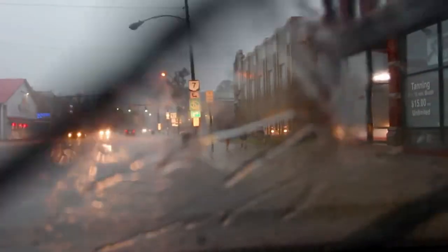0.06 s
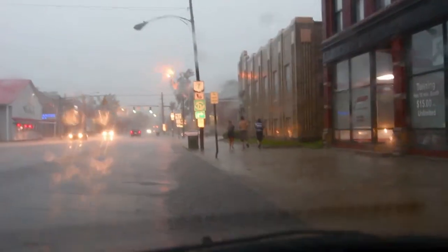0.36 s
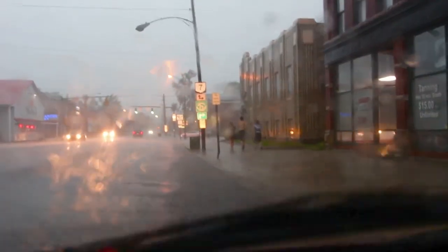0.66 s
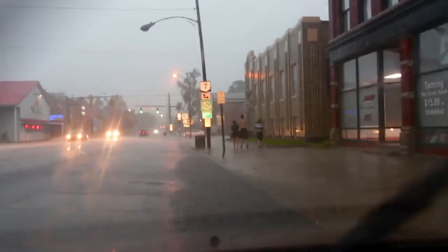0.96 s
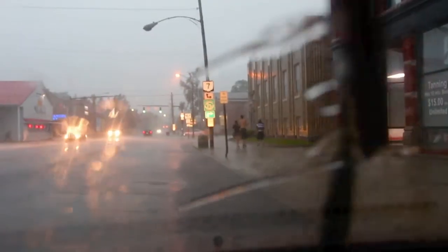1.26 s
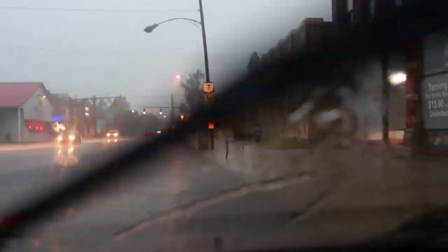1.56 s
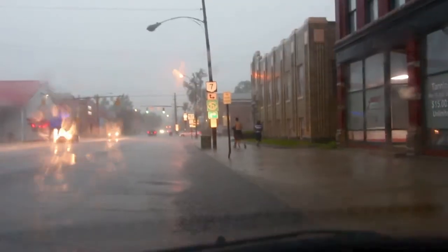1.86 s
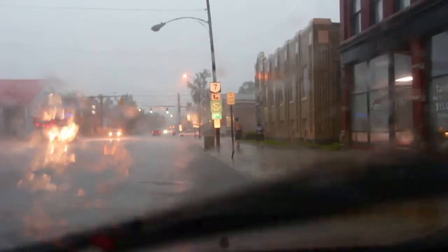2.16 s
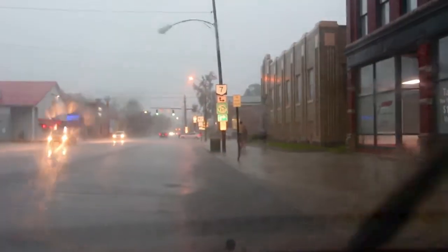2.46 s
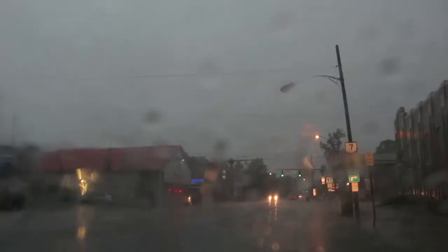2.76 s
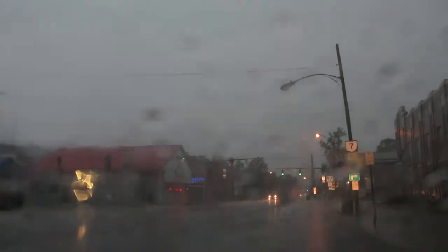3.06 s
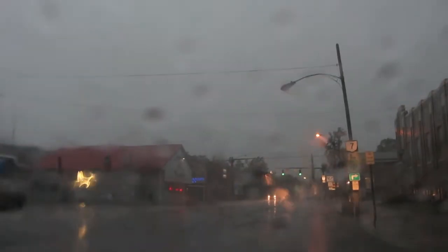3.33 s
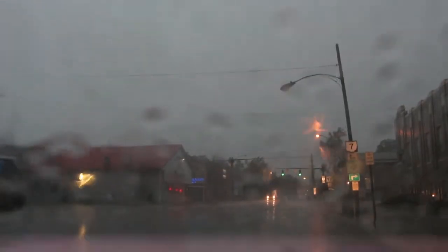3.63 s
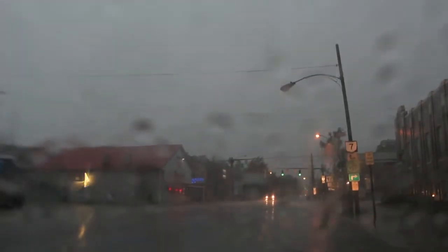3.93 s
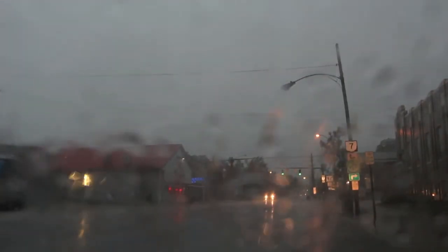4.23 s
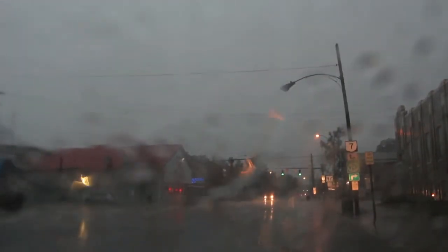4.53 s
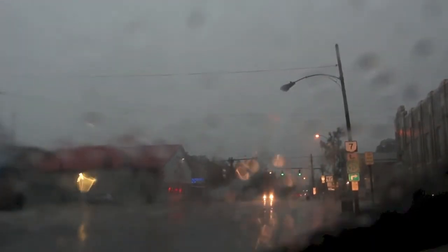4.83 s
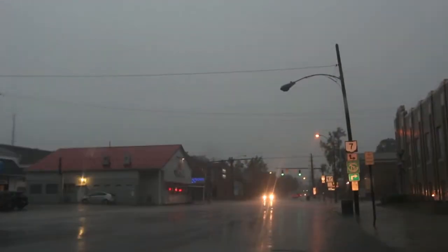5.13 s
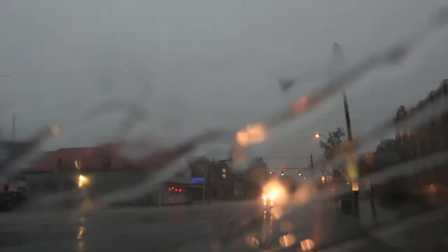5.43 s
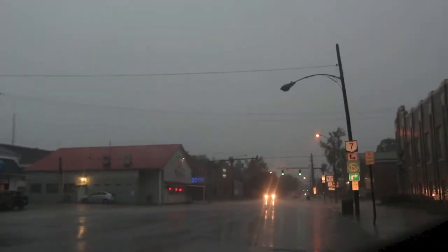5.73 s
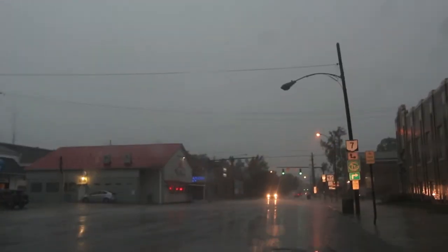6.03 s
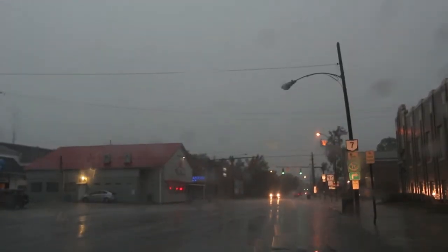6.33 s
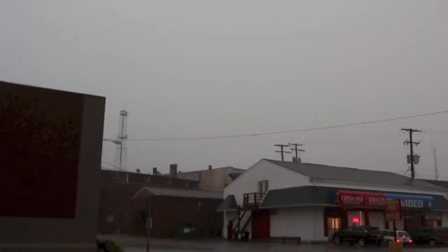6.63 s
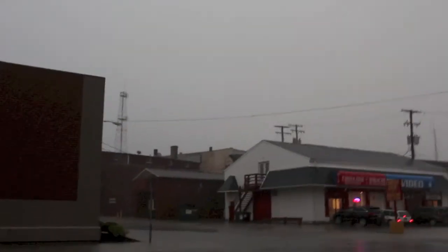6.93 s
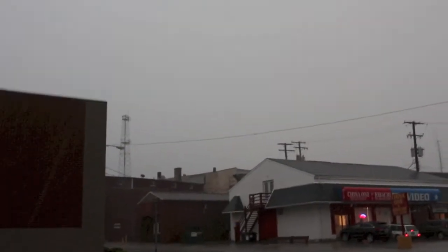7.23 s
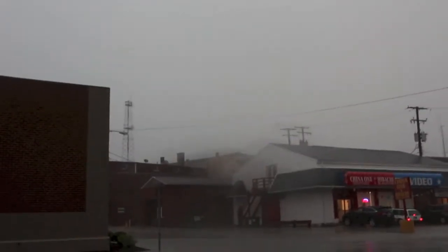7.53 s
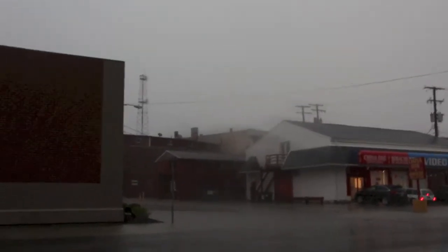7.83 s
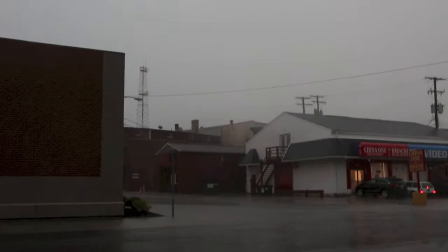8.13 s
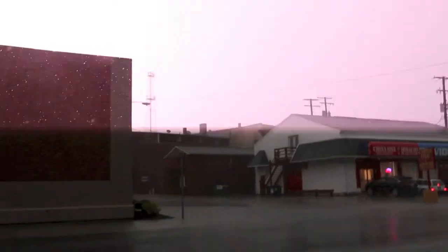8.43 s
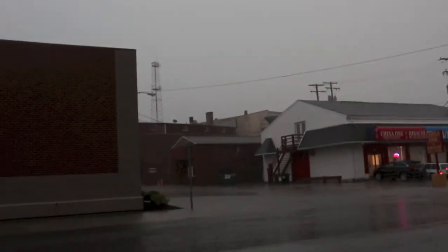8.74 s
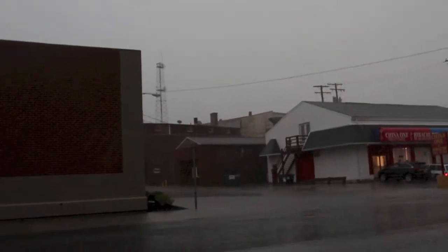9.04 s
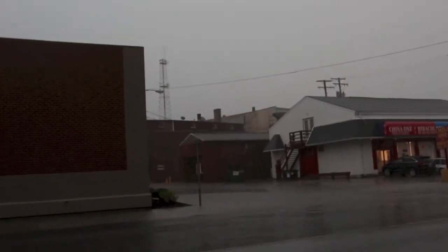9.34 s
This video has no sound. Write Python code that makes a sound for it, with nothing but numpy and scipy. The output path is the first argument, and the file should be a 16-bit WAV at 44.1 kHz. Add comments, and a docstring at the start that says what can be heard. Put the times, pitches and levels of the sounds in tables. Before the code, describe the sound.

From inside a parked car, heavy rain drums on the body and hisses on the street while low thunder rolls and booms, making the cabin drone. A wiper knocks early on and fat drops slap the roof. After a brief dropout, water gushes over the glass and the thunder peaks. Following a second dropout, hard thumps ring a panel, gusts buffet the car and wind whistles through a gap near the end.

```python
"""Thunderstorm from a parked car

Thunder sets the cabin droning, gusts buffet the car and hard thumps ring a panel.
Rain drums on the body and hisses on the street, while single drops slap, tick and splash nearby.
A wiper knocks and squeaks, water gushes over the glass, and late on a gust whistles in a gap.
The recorder's gain ducks the rain sound after loud booms and thuds.
Two quick fades split the storm into three stretches, each with its own tone."""
import sys
import numpy as np
from scipy import signal
from scipy.fft import rfft, irfft, next_fast_len
from scipy.io import wavfile
from scipy.ndimage import uniform_filter1d, minimum_filter1d

SR = 44100
rng = np.random.default_rng(int(sys.argv[2]) if len(sys.argv) > 2 else 0)


def persist_wave(psi):
    """Save psi, clipped to +-1, as 16-bit WAV."""
    counts = np.round(np.clip(psi, -1, 1) * 32767).astype(np.int16)
    wavfile.write(sys.argv[1], SR, np.atleast_2d(counts).T)


N = 418509
TIME = np.arange(N) / SR
SIZE = next_fast_len(N + SR // 4)
FREQS = np.maximum(np.arange(SIZE // 2 + 1) * SR / SIZE, 1)

# The roll of thunder. Each row: time in seconds, deep swell in dB, upper cabin drone in dB.
THUNDER_ROLL = [(0, -38.5, -35.5), (1.3, -31.5, -24.5), (2.1, -30.5, -21.5), (2.25, -39, -27.5),
                (2.4, -32.5, -31.5), (2.55, -39, -33), (2.85, -33, -27), (3.5, -30.5, -20),
                (4.05, -31.5, -26), (4.3, -36.5, -18.5), (4.62, -29, -18), (5.3, -36, -19.5),
                (5.9, -35, -24), (6.1, -33, -20.5), (6.55, -39, -26), (7.25, -38, -27.5),
                (7.65, -40.5, -28.5), (8.0, -38, -23), (8.8, -35.5, -26), (9.49, -39.5, -29.5)]
# Booms within the roll. Each row: start and length in seconds, lower and upper drone in dB.
THUNDER_BOOMS = [(0.057, 0.035, -33.5, -18), (0.13, 0.13, -24, -21.5), (0.352, 0.032, -16.5, -34),
                 (0.426, 0.038, -21, -26), (0.57, 0.02, -17, -30), (0.637, 0.15, -28.5, -21.5),
                 (0.814, 0.067, -14.5, -36.5), (1.003, 0.068, -18.5, -19.5), (1.132, 0.065, -18, -20.5),
                 (1.267, 0.029, -21, -16), (1.405, 0.094, -31.5, -17), (1.586, 0.068, -14, -20.5),
                 (1.817, 0.036, -30, -16.5), (1.982, 0.067, -21.5, -15), (2.18, 0.037, -22.5, -16),
                 (2.373, 0.03, -17.5, -16), (2.442, 0.059, -22, -16.5), (2.543, 0.049, -22, -15),
                 (3.045, 0.022, -9, -27), (3.091, 0.022, -24.5, -14), (3.137, 0.012, -9, -9.5),
                 (3.254, 0.024, -14, -29.5), (3.328, 0.027, -9.5, -21), (3.395, 0.053, -17, -22.5),
                 (3.506, 0.12, -23, -19), (3.993, 0.054, -11.5, -17), (4.504, 0.016, -29.5, -12.5),
                 (4.547, 0.04, -14, -23.5), (4.74, 0.053, -21, -15), (4.912, 0.082, -11.5, -24),
                 (5.135, 0.073, -14, -17.5), (5.234, 0.0074, -21.5, -11.5), (5.323, 0.053, -37, -15),
                 (5.582, 0.077, -21.5, -14), (5.711, 0.11, -33.5, -14), (6.067, 0.057, -19, -13.5),
                 (6.233, 0.017, -26.5, -10), (6.293, 0.023, -21.5, -14.5), (6.432, .035, -16, -24),
                 (6.908, 0.04, -25.5, -27.5), (8.026, 0.022, -20, -18.5), (8.523, 0.031, -35.5, -15.5),
                 (8.827, 0.016, -27, -15.5), (9.092, 0.0092, -29, -15.5), (9.202, 0.018, -14.5, -26.5)]
# The upper drone wavers. Each row: time in seconds, pitch in Hz (only its swing is used).
DRONE_WAVER = [(.5, 183.2), (2.9, 188.2), (3.6, 175.9), (4.8, 195), (5.5, 194.9), (6.0, 179.5),
               (6.45, 193.2), (7.5, 171.5), (8.9, 188.7)]
# Rain drumming on the car. Each row: time in seconds, level in dB.
RAIN_DRUMMING = [(0, -25), (.35, -25), (.9, -28), (2.05, -22), (2.58, -28.5), (2.75, -25.5), (3.1, -24),
                 (3.45, -25), (3.75, -27.5), (4.2, -25), (5.05, -30), (5.65, -29.5), (5.85, -31),
                 (6.55, -32), (6.65, -25.5), (7.25, -24), (7.65, -29), (8.03, -23), (8.15, -25.5),
                 (8.4, -22.5), (8.65, -25), (8.85, -21.5), (9.05, -20.5), (9.49, -28)]
# Rain on street and glass. Each row: time in seconds, hiss in dB, fine spray in dB.
RAIN_HISS = [(0, -47.5, -59), (.9, -53, -77.5), (1.2, -47.5, -66.5), (1.8, -53.5, -72.5),
             (2.58, -53, -77.5), (2.66, -58, -61.5), (3.3, -55.5, -67), (3.47, -59, -74), (3.55, -56, -62),
             (3.85, -55, -61.5), (4.35, -54, -66.5), (5.05, -57, -78.5), (5.25, -54.5, -72.5),
             (5.65, -52, -65.5), (5.85, -54.5, -78), (6.05, -52.5, -66.5), (6.55, -54, -73),
             (6.64, -62.5, -104), (7.15, -57.5, -77), (7.42, -59, -83), (7.6, -54.5, -64.5),
             (8.0, -50.5, -63.5), (8.55, -51.5, -59.5), (8.85, -48.5, -61), (9.25, -55.5, -68.5),
             (9.49, -51, -60)]
# The recorder's gain briefly ducks the rain sound after loud booms and thuds, most in the treble.
# Each row: start and length in seconds, depth for the hiss in dB.
GAIN_DUCKS = [(0.183, 0.016, 8), (1.441, 0.015, 7), (1.625, 0.046, 5.5), (3.133, 0.049, 8),
              (3.355, 0.029, 7.5), (4.027, 0.017, 6), (4.792, 0.027, 4), (4.978, 0.054, 4),
              (5.782, 0.023, 6.5), (7.318, 0.033, 10), (8.681, 0.042, 6.5), (8.883, 0.025, 11.5),
              (9.1, 0.1, 7.5)]
# What that depth is multiplied by for the drumming, the splashing and the spray.
GAIN_DUCK_SHARES = (0.55, 0.85, 1.15)
# Splashing in each stretch, in dB against the average of drumming and hiss.
SPLASH_OFFSETS = (-1, -0.5, 0)
# Gusts, then knocks of the wiper arm. Each row: start in seconds, peak in dB, length in seconds,
# brightness in dB, opening crack in dB.
GUST_THUDS = [(.645, -13.5, 0.02, 8.5, -26), (2.0, -15, 0.0049, 7, -22), (3.136, -12.5, 0.0022, 1, -39),
              (3.258, -17, 0.013, 4.5, -32), (4.008, -13.5, 0.006, -3, -30.5),
              (4.197, -10.5, 0.016, -3, -21), (6.665, -12, 0.014, 1, -31.5),
              (6.802, -12, 0.004, 5.5, -30.5), (6.944, -15, 0.0065, -10.5, -40),
              (7.255, -13, 0.003, -4, -34.5), (8.456, -15, 0.0049, 6, -23),
              (8.645, -11, 0.0029, -15, -27.5), (8.68, -7.5, 0.019, -8.5, -34.5),
              (8.838, -9.5, 0.02, 1, -25), (8.878, -10.5, 0.026, 3.5, -30), (9.04, -10, 0.047, -0.5, -27),
              (9.147, -8.5, 0.018, 2.5, -22.5)]
WIPER_KNOCKS = [(.168, -7.5, 0.019, 14.5, -19), (.305, -13, 0.029, 13.5, -21),
                (1.397, -12, 0.045, 15.5, -23.5), (4.561, -8, 0.012, 18, -15)]
# Rubber catching on glass. Each row: start in seconds, peak in dB, length in seconds, brightness in dB.
WIPER_SQUEAKS = [(1.234, -25.5, .007, -4)]
# Thumps on a panel. Each row: start in seconds, peak in dB, ring time in seconds,
# brightness in dB per octave, opening crack in dB.
PANEL_THUMPS = [(6.646, -13, 0.01, -4, -20.5), (6.738, -9.5, .013, -4, -22), (7.211, -6.5, 0.015, 1, -15.5),
                (7.266, -7.5, .01, 0.5, -22.5), (7.291, -7.5, 0.009, -5, -26.5),
                (7.314, -7.5, 0.0071, -7.5, -26.5), (9.092, -10, 0.0089, -3.5, -19.5)]
# The notes that panel rings at. Each row: pitch in Hz, level in dB.
PANEL_MODES = [(272, 0.5), (365, -5.5), (535, -6.5), (775, -12), (1287, -27)]
# Fat drops on the roof. Each row: start in seconds, peak in dB.
ROOF_SLAPS = [(.624, -25), (.675, -13), (.913, -16), (1.736, -23.5), (1.948, -17), (2.357, -18),
              (2.466, -16), (3.093, -15), (3.365, -17.5), (3.411, -17), (3.883, -17.5), (4.411, -21),
              (4.477, -19.5), (4.752, -13.5), (5.655, -18.5), (7.95, -17)]
# Close drops. Each row: start in seconds, peak in dB, left over right in dB, brightness in dB.
CLOSE_DROPS = [(1.061, -42.5, -17, -6), (1.2945, -40, -13, -14), (2.089, -48, -9, -10),
               (2.706, -32, -12, -11), (2.815, -29, -20, -11), (6.098, -39, -19, -27),
               (6.919, -37.5, -7, -27), (7.4736, -22, -11, 15), (7.993, -32.5, 3, -15)]
# Bursting drops. Each row: start in seconds, peak in dB, left over right in dB, pitch in Hz.
CLOSE_SPLASHES = [(7.924, -49, -15, 4900), (7.967, -48.5, -8, 4840), (8.44, -42, 8, 3260),
                  (8.561, -56, -15, 11800), (8.61, -61, -11.5, 8750), (9.147, -57, -15, 4700),
                  (8.338, -66, -14, 9450)]
# Water running over the glass. Each row: time in seconds, level in dB.
GUSH_LEVELS = [(2.61, -71), (2.645, -31), (2.76, -33), (2.99, -35), (3.1, -42.5), (3.2, -68), (3.4, -88)]
# Wind in a gap. Each row: time in seconds, pitch in Hz, level in dB.
GAP_WHISTLE = [(8.68, 900, -63), (8.83, 927, -28.5), (8.92, 920, -42.5), (9.05, 975, -39), (9.17, 915, -46),
               (9.3, 943, -45), (9.49, 957, -57)]
# The tone of each small source. Each row: frequency in Hz, gain in dB.
GUST_TONE = [(60, -41.5), (170, -0.5), (270, 4.5), (450, -1.5), (750, -14.5), (1400, -28.5), (3000, -59),
             (12000, -125)]
KNOCK_TONE = [(60, -25.5), (150, 1.5), (400, 12.5), (600, 4), (900, -3), (1300, -23.5), (2000, -30),
              (3200, -50.5), (10000, -115)]
SQUEAK_TONE = [(500, -32.5), (1100, -9), (1320, 16.5), (1550, -23.5), (3000, -66)]
CRACK_TONE = [(300, -4.5), (700, 8.5), (1400, -5.5), (2100, -14.5), (3000, -29.5), (6000, -66.5),
              (13000, -100)]
SLAP_TONE = [(200, -5), (570, 6.5), (850, -7), (1400, -19), (3000, -38), (13000, -105)]
DROP_TONE = [(600, -37), (1400, -17.5), (1900, 14.5), (2700, 7), (3600, 0), (5000, -9.5), (7000, -13.5),
             (9000, -37.5), (13000, -64.5)]
GUSH_TONE = [(300, -17), (700, 4.5), (1200, -2.5), (2200, -11.5), (3400, -15.5), (5000, -25), (6500, -37),
             (9000, -49.5), (13000, -69)]
# The tone of the storm in each stretch. Each row: frequency in Hz, gain in dB.
FIRST_TONE = [(25, -16), (55, -9), (95, -13.5), (135, 7.5), (200, -3), (240, -12.5), (320, -10), (560, -18),
              (800, -24.5), (1300, -38), (2200, -42.5), (3400, -48.5), (4400, -62), (5500, -73.5),
              (8000, -88.5), (12000, -102)]
SECOND_TONE = [(25, -26), (60, -20), (95, -21.5), (130, -3), (200, -2), (260, -16.5), (340, -16),
               (540, -20.5), (800, -26.5), (1300, -37.5), (1750, -39), (2400, -40), (3400, -44.5),
               (4400, -59), (5500, -68), (8000, -90.5), (12000, -102)]
THIRD_TONE = [(25, -18.5), (55, -21.5), (100, -14), (175, 4), (215, 2), (260, 1.5), (480, -14.5),
              (700, -13), (1000, -19), (2100, -34.5), (3400, -44), (4400, -61.5), (5500, -73), (7000, -83),
              (9000, -89), (12000, -91.5)]
# Pitches the cabin boosts. Each row: centre in Hz, width in Hz, boost in dB.
CABIN_RESONANCES = [(68, 53, 6), (124, 2.3, 8), (184.6, 12, 8.5), (515, 190, 5.5)]
# Near-silent moments between stretches. Each row: time, fade-out and fade-in, all in seconds.
FADES = [(2.629, 0.089, 0.095), (6.598, 0.084, 0.054)]
# The left side against the right. Each row: frequency in Hz, level in dB, phase lead in radians,
# likeness from 0 to 1.
STEREO_IMAGE = [(25, 0, -.2, .98), (60, -.2, -.42, .99), (150, -1.5, -.72, .995), (250, -3.2, -1, .985),
                (400, -7.2, -1.35, .97), (620, -11, -1.6, .93), (1000, -16.3, -2.3, .67),
                (1500, -20, -3.5, .68), (3000, -22.5, -4.3, .76), (4500, -20, -4.6, .76),
                (9000, -10, -4.6, .3)]


def thunder():
    """Rolling pressure pulses set two cabin resonances droning over a deep swell; booms drive them."""
    swell_db, drone_db = in_time(THUNDER_ROLL)
    lower_power = from_db(-26.5 + 0.52 * (swell_db - swell_db.mean())) ** 2   # partly follows the swell
    upper_power = from_db(drone_db - 2.5) ** 2
    for s, length_s, lower_db, upper_db in THUNDER_BOOMS:
        power = swell_and_fade(s, length_s, attack_s=0.0051, release_s=0.02) ** 2
        lower_power += power * from_db(lower_db - 3) ** 2
        upper_power += power * from_db(upper_db - 1) ** 2
    pulses = impacts(per_s=250, spread_db=0.5, wash_db=-4.5)
    lower = np.sqrt(lower_power) * through_car(pulses, 78, 160.8, span_s=0.045)
    drone_hz, = in_time(DRONE_WAVER)
    drone = through_car(pulses, 177.4, 256.6, span_s=0.056)
    upper = np.sqrt(upper_power) * shifted(drone, drone_hz - drone_hz.mean())
    swell = from_db(swell_db - 0.5) * through_car(pulses, 24, 97, span_s=0.26)
    return lower + upper + swell


def rain():
    """Heavy drops drum on the panels; countless small ones splash and hiss on glass and street."""
    drumming_db, = in_time(RAIN_DRUMMING)
    hiss_db, spray_db = in_time(RAIN_HISS)
    stretch = np.searchsorted([s for s, _, _ in FADES], TIME)
    splash_db = (drumming_db + hiss_db) / 2 + np.take(SPLASH_OFFSETS, stretch)
    duck_db = sum(depth * swell_and_fade(s, length_s, attack_s=0.0098, release_s=0.04)
                  for s, length_s, depth in GAIN_DUCKS)
    drumming_duck, splash_duck, spray_duck = [share * duck_db for share in GAIN_DUCK_SHARES]
    heavy = impacts(per_s=600, spread_db=0.5, wash_db=2)
    # small drops arrive in clumps
    clumps = from_db(0.45 * wander(rate_hz=51)) * (1 + 0.44 * flurries(per_s=19, decay_s=0.018))
    fine = impacts(per_s=900, spread_db=0.5, wash_db=2) * clumps
    patter = fine * np.sqrt(clumps)
    ticks = impacts(per_s=26, spread_db=1.5, wash_db=-39.5)   # the nearest drops stand out
    drumming = from_db(drumming_db - drumming_duck - 1.04) * through_car(heavy, 250.5, 727, span_s=0.64)
    splash = from_db(splash_db - splash_duck) * through_car(heavy + fine, 866, 1770, span_s=0.76)
    hiss = from_db(hiss_db - duck_db) * through_car(patter + 0.28 * ticks, 2000, 4300, span_s=0.21)
    spray = from_db(spray_db - spray_duck) * through_car(patter + 0.35 * ticks, 4300, 13000, span_s=1)
    return drumming + splash + hiss + spray


def gusts():
    """Gusts buffet the car with short, dull thuds."""
    return blows(GUST_THUDS, GUST_TONE, corner_hz=437)


def panel_thumps(attack_s=0.0014, crack_s=0.0043):
    """A hard blow opens with a crack and rings the panel, whose higher notes die sooner."""
    hz, mode_db = np.transpose(PANEL_MODES)[..., None]
    age, ratio = TIME[:SR // 4], hz / hz[0]
    click, out = response(CRACK_TONE), 0
    for s, db, ring_s, tilt_db, crack_db in PANEL_THUMPS:
        turns = hz * (1 + 0.048 * rng.standard_normal(hz.shape)) * age   # each thump is a bit off pitch
        decay = np.exp(-age * np.sqrt(ratio) / ring_s)
        modes = from_db(mode_db + tilt_db * np.log2(ratio)) * np.sin(2 * np.pi * turns) * decay
        ring = at_peak(modes.sum(axis=0) * (1 - np.exp(-age / attack_s)), db)
        crack = at_peak(signal.fftconvolve(burst(crack_s), click), crack_db)
        out = out + placed(ring, s) + placed(crack, s)
    return out


def wiper():
    """The wiper arm knocks, and its rubber catches on the glass with a squeak."""
    knocks = blows(WIPER_KNOCKS, KNOCK_TONE, corner_hz=2300)
    squeak = blow(response(SQUEAK_TONE), *WIPER_SQUEAKS[0], corner_hz=1300)
    return knocks + squeak


def roof_slaps():
    """Fat drops each give the roof one short blow."""
    roof = response(SLAP_TONE)
    return sum(placed(at_peak(roof, db), s) for s, db in ROOF_SLAPS)


def close_drops(length_s=0.0019):
    """Single drops tick on the frame right by the listener."""
    tick = response(DROP_TONE)
    return sum(panned(blow(tick, s, db, length_s, bright_db, corner_hz=2800), pan_db)
               for s, db, pan_db, bright_db in CLOSE_DROPS)


def close_splashes(tick_s=0.0013, spray_db=-21.5, spray_s=0.05, band_ratio=1.13):
    """A drop bursts with a bright tick, and its droplets trail off as a fine spray."""
    age, out = TIME[:SR // 3], 0
    envelope = np.exp(-age / tick_s) + from_db(spray_db) * np.exp(-age / spray_s)
    for s, db, pan_db, hz in CLOSE_SPLASHES:
        around_pitch = signal.butter(2, [hz / band_ratio, hz * band_ratio], "band", fs=SR, output="sos")
        splash = signal.sosfilt(around_pitch, envelope * rng.standard_normal(len(age)))
        out = out + panned(placed(at_peak(splash, db), s), pan_db)
    return out


def gush():
    """A sheet of water on the glass breaks into splattering clumps of drops."""
    level_db, = in_time(GUSH_LEVELS)
    water = shaped(impacts(per_s=490, spread_db=0, wash_db=1), tone_filter(GUSH_TONE))
    level = from_db(level_db + 0.52 * wander(rate_hz=46))
    return panned(steady(water, span_s=0.042) * level, pan_db=-14.5)


def whistle(width_hz=17):
    """Wind rushes through a gap: a narrow band of noise that rises with the gust."""
    hz, level_db = in_time(GAP_WHISTLE)
    phase = 2 * np.pi * np.cumsum(hz) / SR
    rush = wander(width_hz) * np.sin(phase) + wander(width_hz) * np.cos(phase)
    return rush * from_db(level_db) * (TIME > GAP_WHISTLE[0][0]) * from_db([[-3], [-1]])


def through_car(x, low_hz, high_hz, span_s):
    """One band of the storm, given the car's tone in each stretch and evened out to level 1."""
    cabin_db = sum(boost * resonance(hz, width) for hz, width, boost in CABIN_RESONANCES)
    spectrum = rfft(x, SIZE) * band(low_hz, high_hz)
    out = np.zeros((2, N))
    for s, tone in zip([0, FADES[0][0], FADES[1][0]], [FIRST_TONE, SECOND_TONE, THIRD_TONE]):
        start = int(s * SR)
        heard = irfft(spectrum * from_db(in_frequency(tone)[0] + cabin_db), SIZE)[:, :N]
        out[:, start:] = steady(heard, span_s)[:, start:]
    return out


def stereo(direct, diffuse):
    """The left side hears the storm later and duller, and less like the right in the treble."""
    balance_db, phase, alike = in_frequency(STEREO_IMAGE)
    balance = from_db(balance_db)
    centre = np.sqrt(1 + balance ** 2 + 2 * balance * alike * np.cos(phase)) / 2
    to_left = balance * np.exp(1j * phase) / centre
    left = shaped(direct, to_left * alike) + shaped(diffuse, to_left * np.sqrt(1 - alike ** 2))
    return np.array([left, shaped(direct, 1 / centre)])


def impacts(per_s, spread_db, wash_db):
    """Two unrelated showers of uneven impacts over the smooth wash of far ones."""
    sizes = from_db(spread_db * np.minimum(rng.exponential(1, (2, N)), 4))
    hits = sizes * rng.choice([-1, 1], (2, N)) * (rng.random((2, N)) < per_s / SR)
    return hits / hits.std() + from_db(wash_db) * rng.standard_normal((2, N))


def flurries(per_s, decay_s):
    """A level that jumps and falls back each time a fat drop shatters into droplets."""
    sizes = np.minimum(rng.exponential(1, N), 2.5) * (rng.random(N) < per_s / SR)
    return signal.lfilter([1], [1, -np.exp(-1 / (decay_s * SR))], sizes + 1e-18)


def blows(table, tone, corner_hz):
    """Short rushes of pressure, dulled by the body they strike; each opens with a crack."""
    body, crack = response(tone), response(CRACK_TONE)
    return sum(blow(body, s, db, length_s, bright_db, corner_hz) + placed(at_peak(crack, crack_db), s)
               for s, db, length_s, bright_db, crack_db in table)


def blow(body, s, peak_db, length_s, bright_db, corner_hz):
    """One rush of pressure through a body; a harder contact lifts the range above the corner."""
    rush = signal.fftconvolve(burst(length_s), body)
    filters = [signal.butter(1, corner_hz, kind, fs=SR, output="sos") for kind in ("low", "high")]
    low, high = [signal.sosfilt(np.vstack([sos, sos]), rush) for sos in filters]
    return placed(at_peak(low - from_db(bright_db) * high, peak_db), s)


def burst(length_s):
    """A short rush of noise that rises fast and dies away."""
    age = TIME[:SR // 4] / length_s
    return rng.standard_normal(len(age)) * np.sqrt(age) * np.exp(-np.minimum(age, 10) ** 2)


def swell_and_fade(s, length_s, attack_s, release_s):
    """A level that rises to 1, holds until its length is up, then dies away."""
    live = slice(int(s * SR), int((s + length_s + 10 * release_s) * SR))
    age, out = TIME[live] - s, np.zeros(N)
    out[live] = np.clip(age / attack_s, 0, 1) * np.exp(-np.maximum(age - length_s, 0) / release_s)
    return out


def wander(rate_hz):
    """A slow random wobble with a typical size of 1."""
    slow = shaped(rng.standard_normal(N), band(1, rate_hz))
    return slow / slow.std()


def response(tone):
    """How a body with this tone answers a single click."""
    return irfft(tone_filter(tone), SIZE)[:SR // 8]


def tone_filter(tone):
    """A filter with this tone that makes no sound before the blow (minimum phase)."""
    cepstrum = irfft(np.log(from_db(in_frequency(tone)[0])), SIZE)
    cepstrum[1:SIZE // 2] *= 2
    cepstrum[SIZE // 2 + 1:] = 0
    return np.exp(rfft(cepstrum))


def band(low_hz, high_hz):
    """Gains that keep only what lies between two frequencies."""
    return ((1 + (low_hz / FREQS) ** 16) * (1 + (FREQS / high_hz) ** 16)) ** -.5


def resonance(hz, width_hz):
    """A hump of height 1 around one frequency."""
    return 1 / (1 + ((FREQS ** 2 - hz ** 2) / (FREQS * width_hz)) ** 2)


def shaped(x, gain):
    """Filter with a gain for each frequency."""
    return irfft(rfft(x, SIZE) * gain, SIZE)[..., :N]


def shifted(x, hz):
    """Move every frequency by so many Hz."""
    return np.real(signal.hilbert(x, SIZE)[..., :N] * np.exp(2j * np.pi * np.cumsum(hz) / SR))


def steady(x, span_s):
    """Even out the level to 1 over each span, keeping the quicker grain."""
    power = uniform_filter1d(x ** 2, int(span_s * SR), axis=-1)
    return x / np.sqrt(np.abs(power) + 1e-20)


def limiter(x, ceiling, size):
    """Turn the level down smoothly around any peak above the ceiling."""
    allowed = ceiling / np.maximum(np.abs(x).max(axis=0), ceiling)
    held = minimum_filter1d(allowed, 2 * size)
    return x * uniform_filter1d(uniform_filter1d(held, size), size)


def in_time(rows):
    """Turn each column into a curve over time."""
    s, *columns = np.transpose(rows)
    return [np.interp(TIME, s, c) for c in columns]


def in_frequency(rows):
    """Turn each column into a curve over frequency."""
    hz, *columns = np.transpose(rows)
    return [np.interp(np.log(FREQS), np.log(hz), c) for c in columns]


def at_peak(x, peak_db):
    """Scale a sound to its peak level."""
    return x * from_db(peak_db) / (np.abs(x).max() + 1e-20)


def placed(x, s):
    """Start a short sound at second s."""
    return np.pad(x, (int(s * SR), N))[:N]


def panned(x, pan_db):
    """Make two channels, with the left pan_db above the right."""
    return x * from_db([[pan_db / 2], [-pan_db / 2]])


def from_db(db):
    """Turn decibels into a plain multiplier."""
    return 10 ** (np.asarray(db) / 20)


def scene():
    """The storm around the car, with the small sounds close by."""
    direct, diffuse = thunder() + rain()
    hits = gusts() + panel_thumps() + wiper() + roof_slaps()
    water = close_drops() + close_splashes() + gush()
    return stereo(direct + hits, diffuse) + water + whistle()


def record(dry):
    """Fade out and in between stretches, hold down the peaks and cut the highest treble."""
    fade = np.ones(N)
    for s, out_s, in_s in FADES:
        fade *= np.clip(np.maximum((s - TIME) / out_s, (TIME - s) / in_s), .02, 1) ** 1.15
    held = limiter(dry * fade, ceiling=.98, size=256)
    cutoff_hz = 15500
    return signal.sosfilt(signal.cheby2(12, 70, cutoff_hz, fs=SR, output="sos"), held)


dry = scene()
out = record(dry)
persist_wave(out)
```